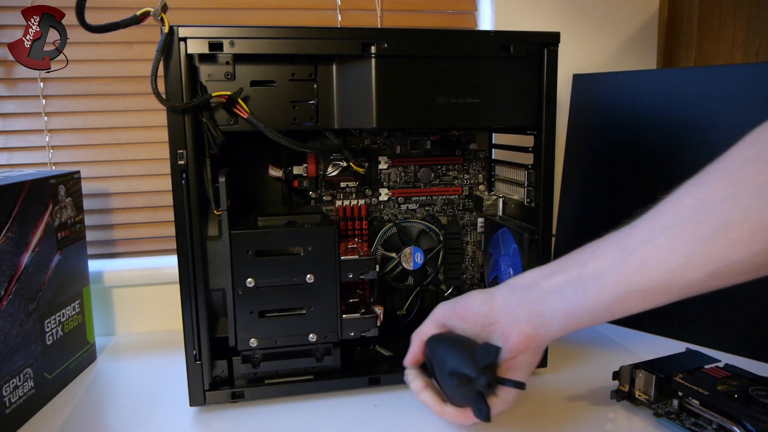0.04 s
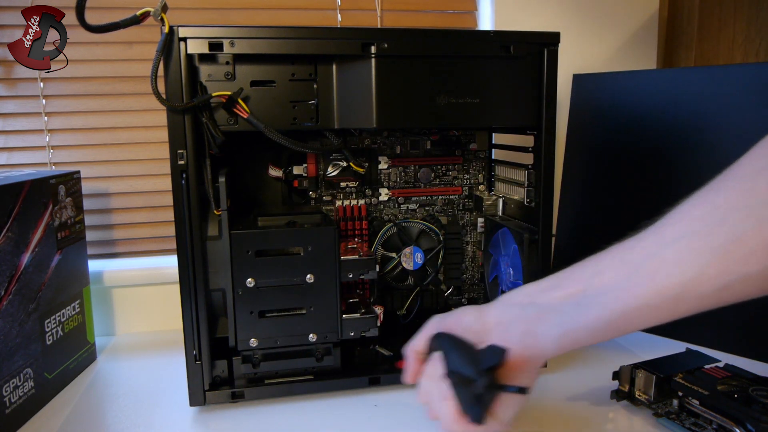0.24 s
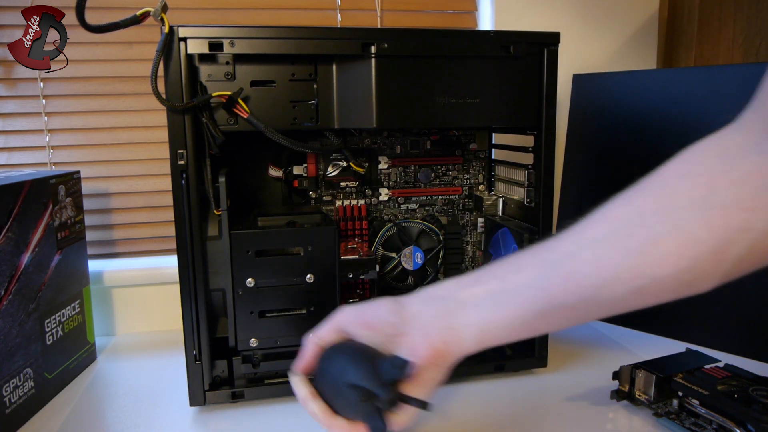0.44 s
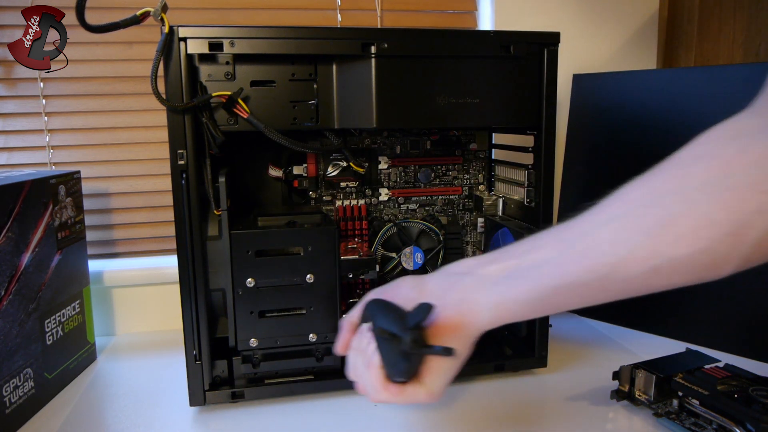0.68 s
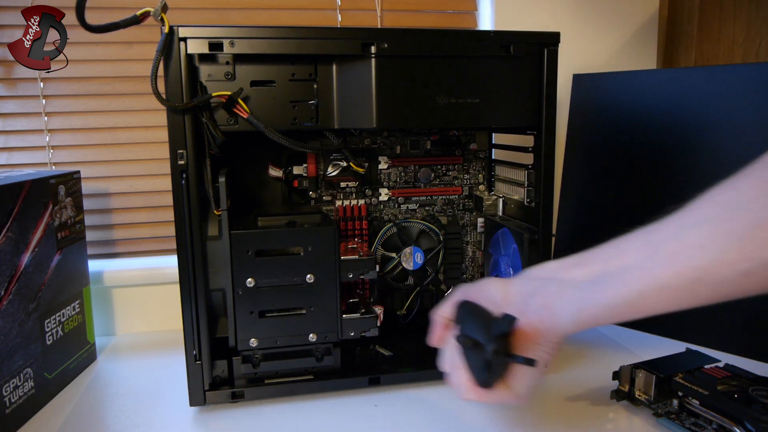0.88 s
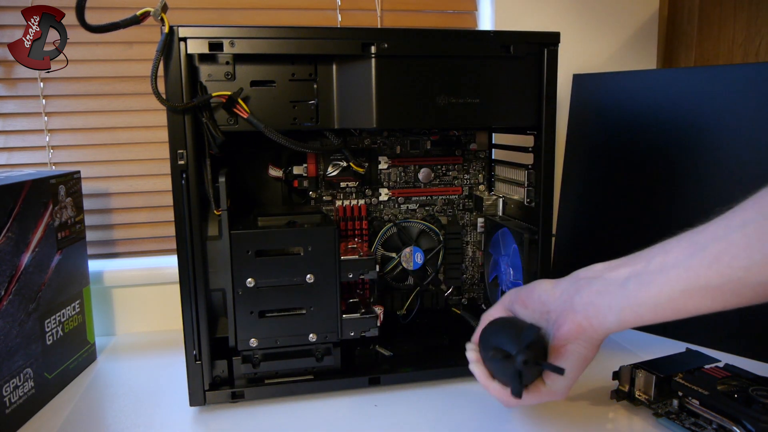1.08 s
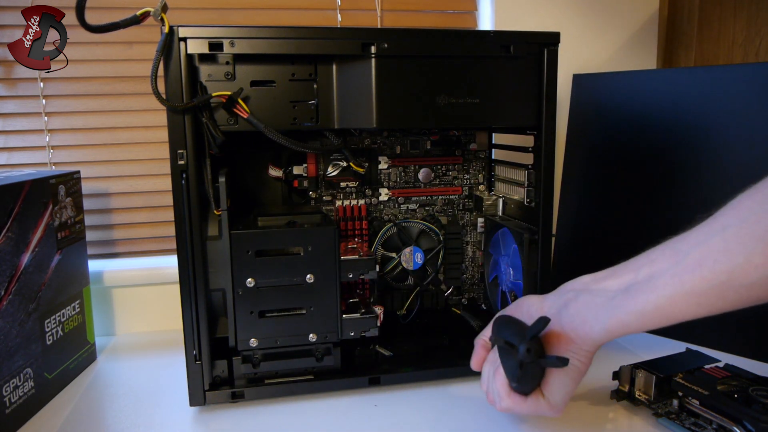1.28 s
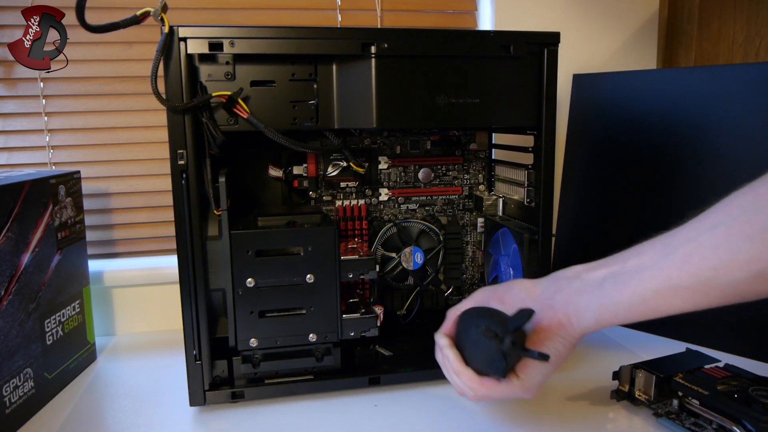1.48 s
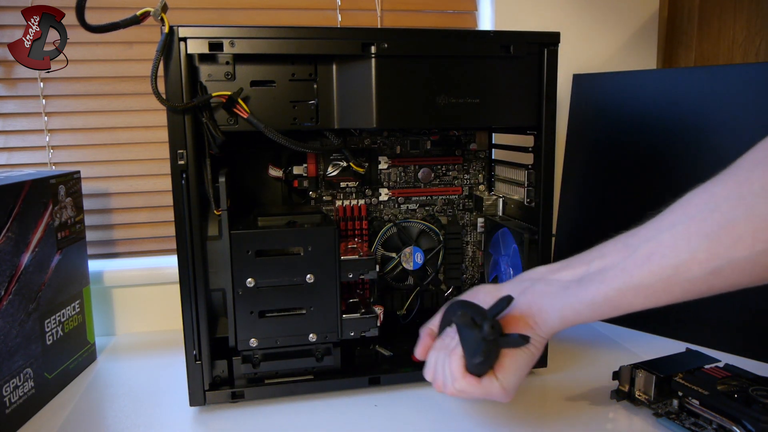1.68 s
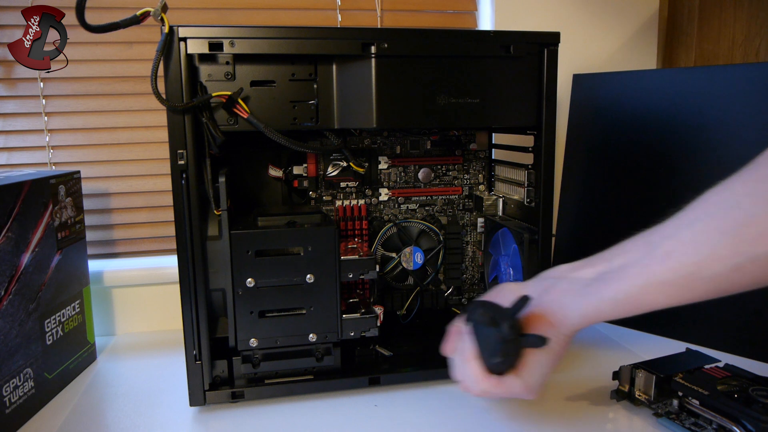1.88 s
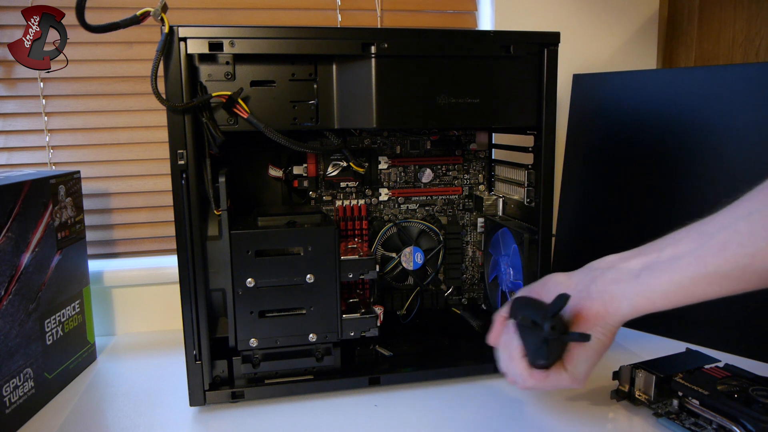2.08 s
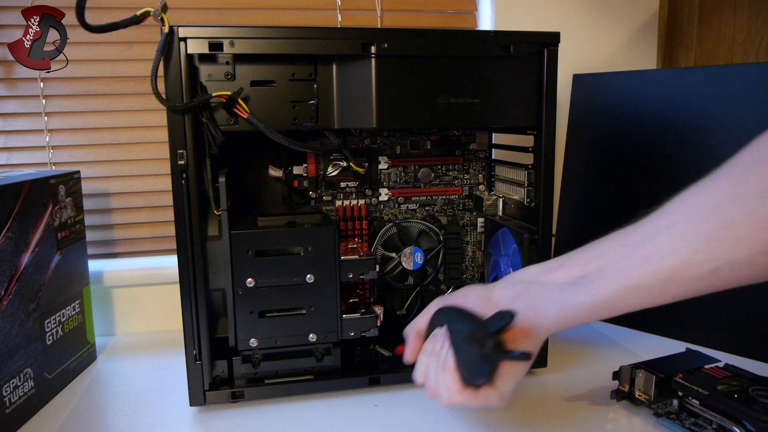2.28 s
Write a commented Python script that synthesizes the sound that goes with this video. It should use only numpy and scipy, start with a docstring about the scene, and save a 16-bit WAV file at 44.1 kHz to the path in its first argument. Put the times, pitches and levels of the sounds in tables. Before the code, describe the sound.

A rubber air blower puffs seven times, hissing and popping softly as it refills.

```python
"""A rubber bulb blower is pumped seven times at an open computer case in a small quiet room.
In each cycle air hisses in through the inlet valve, the elastic bulb pops back into shape,
and a squeeze drives a turbulent jet from the nozzle. The second puff strikes a sharp edge in the
case and becomes a loud, half-whistling hiss. Fingers knock softly on the rubber, the metal
panels reflect the hiss, and the room answers with low modes and a short reverberation."""
import sys
import numpy as np
from scipy import signal
from scipy.fft import rfft, irfft
from scipy.io import wavfile

SR = 44100
rng = np.random.default_rng(int(sys.argv[2]) if len(sys.argv) > 2 else 0)


def store_pcm(level_fs):
    """Save levels as 16-bit WAV."""
    pcm = np.round(np.clip(level_fs, -1, 1) * 32767).astype(np.int16)
    wavfile.write(sys.argv[1], SR, np.atleast_2d(pcm).T)


N = 108045
T = np.arange(N) / SR
HZ = np.maximum(np.arange(N // 2 + 1) * SR / N, 1)

# Squeezes of the bulb; rush, fine hiss and hollow are offsets from the level:
# start_s, peak_s, end_s, level_db, rush_db, fine_db, hollow_db, rise_exponent, jet_pitch_ratio
SQUEEZES = [(0.151, 0.229, 0.32, -30.5, 0.5, 1, -25, 0.97, 0.92),
            (0.48, 0.543, 0.75, -32, -8, 2.5, -2, 0.86, 0.85),
            (0.808, 0.906, 1.004, -38, 4, 4, -24, 1.2, 1.48),
            (1.201, 1.29, 1.397, -31, 1.5, 2, -4.5, 0.99, 1.04),
            (1.515, 1.618, 1.715, -27, -6.5, -1.5, -6.5, 1.93, 0.95),
            (1.878, 1.945, 2.057, -27, -8.5, -3, -4, 0.72, 1.04),
            (2.244, 2.317, 2.433, -32.5, 2.5, 1, -18, 1.82, 1.02)]
# Spectra of a puff's low rush, main jet and fine hiss: frequency_hz, relative_db
RUSH_SPECTRUM = [(90, -51.5), (200, -10.5), (400, -1), (750, -5), (1300, -8.5), (2200, -22), (5000, -55)]
JET_SPECTRUM = [(500, -32), (1200, -3), (2300, -4), (3600, -2), (4300, -4), (5600, -3.5), (7200, -11),
                (10000, -19.5), (16000, -19)]
FINE_SPECTRUM = [(2000, -28), (5000, -9.5), (7200, -5.5), (8500, -0.5), (10200, 1.5), (12800, -5),
                 (15500, -4.5)]
# Envelope of the jet on the edge: time_s, level_db
EDGE_ENVELOPE = [(.486, -101), (.502, -30), (0.52, -18.5), (.554, -13.5), (.59, -18.5), (.625, -25),
                 (.66, -45.5), (.70, -60)]
# Spectrum of the hiss at the edge: frequency_hz, relative_db
EDGE_SPECTRUM = [(1500, -32), (2800, -6.5), (3700, -1.5), (4600, -11), (5300, 0.5), (6200, 0.5), (7200, -2),
                 (8300, 0.5), (9200, -0.5), (11500, 1.5), (14000, 0), (15800, -9)]
# Resonances at the edge: pitch_hz, half_width_hz, relative_db
EDGE_RESONANCES = [(2966, 220, -16.5), (4368, 45, -12.5), (4635, 150, -11), (4740, 60, -18),
                   (4960, 75, -14), (5744, 51, -18.5), (6360, 61, -18.5), (8955, 52, -15), (9378, 40, -19),
                   (9970, 130, -13.5), (11300, 54, -15.5)]
# Spits as the jet crosses a part: centre_s, half_length_s, level_db
SPIT_BURSTS = [(1.21, 0.01, -43.5), (1.296, .005, -23.5)]
# Spectrum of a spit: frequency_hz, relative_db
SPIT_SPECTRUM = [(200, -35.5), (900, -8), (2200, -2), (5500, 0), (10500, -5), (14000, -18)]
# Intakes through the valve: open_s, full_s, level_db, sizzle_relative_db
INTAKES = [(-.015, .1, -33.5, -4), (0.335, .445, -32.5, -5), (0.682, .795, -36, -2), (0.999, 1.108, -35, 0),
           (1.383, 1.498, -34.5, -2.5), (1.73, 1.843, -34.5, -3.5), (2.078, 2.186, -35.5, -1.5)]
# Spectrum of the inflow: frequency_hz, relative_db
INLET_SPECTRUM = [(250, -10), (900, -10.5), (2000, -9.5), (3700, -3), (5000, 0), (6000, 2.5), (6700, 2),
                  (7900, 4.5), (10500, 2.5), (12900, -3), (15500, -5)]
# Breathy whistles of the valve: intake_index, pitch_hz, relative_db
INLET_WHISTLES = [(0, 4500, -13), (1, 5020, -12), (1, 5980, -9.5), (2, 4560, -9), (3, 6050, -11),
                  (3, 7750, -11), (3, 11700, -13), (4, 5900, -11), (5, 6100, -12), (6, 7950, -9)]
# Pops of the bulb: start_s, level_db, pitch_hz, push_relative_db, tick_relative_db
BULB_POPS = [(0.096, -23, 520, -4.5, -28), (0.4438, -22, 520, -2.5, -28), (0.7904, -25, 560, -1.5, -31),
             (1.1047, -32, 536, 1.5, -6.5), (1.4979, -16.5, 586, -15.5, -4.5), (1.84, -32, 520, 0.5, -5.5),
             (2.1863, -19, 575, -4.5, -12)]
# Spectrum of a pop's tick: frequency_hz, relative_db
TICK_SPECTRUM = [(200, -21), (1000, -4.5), (2200, -12.5), (4000, -15), (6200, -3.5), (8500, -13.5),
                 (15000, -19.5)]
# Knocks of fingers on the rubber: start_s, level_db, pitch_hz
FINGER_KNOCKS = [(0.335, -44, 227), (0.683, -47, 215), (1.002, -49, 171), (1.383, -43.5, 207),
                 (1.729, -48, 260), (1.789, -41.5, 300), (2.07, -44.5, 220), (2.125, -49, 560)]
# Reflections inside the case: left_delay_s, right_delay_s, gain_db
PANEL_REFLECTIONS = [(.00145, 0.0012, -19.5), (.0031, 0.0028, -12), (.0054, 0.0067, -10.5)]
# Reflections of a pop from nearby surfaces: delay_s, gain_db
WALL_REFLECTIONS = [(.0045, -18.5), (0.0182, -8.5)]
# Low modes of the room: pitch_hz, relative_db, t60_s
STANDING_WAVES = [(83.5, -41.5, 0.66), (133.5, -22.5, 0.36), (212.7, -13.5, 0.19), (340, -14.5, 0.092),
                  (425.3, -7.5, 0.2), (520, -27, 0.073), (589, -8.5, 0.11)]
# Likeness of left and right noise: frequency_hz, correlation
STEREO_CORRELATION = [(100, 0.98), (700, 0.98), (1200, 0.77), (2000, 0.67), (3000, 0.25), (3700, 0.63),
                      (5800, 0.63), (7500, -0.35), (9500, 0.44), (12500, 0.072), (14500, 0.47)]
# Spectrum of the room's background: frequency_hz, relative_db
BACKGROUND_SPECTRUM = [(25, -31), (60, -14), (130, 4.5), (220, 8.5), (500, 4), (1000, -5.5),
                       (3000, -19), (8000, -6), (16000, -14)]


def nozzle_puffs():
    """Turbulent jet noise follows the flow of each squeeze and excites a recess of the case."""
    rush = jet = fine = hollow = 0
    fall_exponent = 2.89
    for start, peak, end, db, rush_db, fine_db, hollow_db, rise_exponent, pitch_ratio in SQUEEZES:
        squeeze = np.interp(T, [start, peak, end], [0, 1, 0])
        rounded = squeeze ** 0.58 * np.sin(np.pi / 2 * squeeze) ** 0.42
        flow = rounded ** np.where(T < peak, rise_exponent, fall_exponent)
        rush += from_db(db + rush_db - 5) * flow ** 0.74
        jet += from_db(db) * flow * hiss([(hz * pitch_ratio, level) for hz, level in JET_SPECTRUM])
        hollow += from_db(db + hollow_db) * flow
        fine += from_db(db + fine_db - 1.5) * flow ** 0.83
    air = jet + rush * hiss(RUSH_SPECTRUM)
    air += hollow * resonant_noise(hz=2430, half_width_hz=610)
    air += fine * hiss(FINE_SPECTRUM)
    return air * turbulence(depth_db=1.23)


def edge_tones():
    """A jet splitting on an edge sheds bright hiss and rough whistles; the lower ones last longer."""
    times, levels = np.transpose(EDGE_ENVELOPE)
    flow = from_db(np.interp(T, times, levels, left=-120, right=-120) - levels.max())
    air = flow * hiss(EDGE_SPECTRUM) * pan(db=1)
    for hz, half_width_hz, db in EDGE_RESONANCES:
        envelope = flow ** (0.45 if hz < 7000 else 1)
        position = pan(db=1.94 * (hz - 4000) / 1000)
        air += from_db(db) * envelope * resonant_noise(hz, half_width_hz) * position
    return from_db(levels.max()) * air * turbulence(depth_db=1.0)


def spits():
    """Flow noise flares briefly as the jet crosses an obstacle."""
    envelope = sum(from_db(db) * pulse(centre, half_length) for centre, half_length, db in SPIT_BURSTS)
    return envelope * hiss(SPIT_SPECTRUM)


def inlet_valve():
    """Flow through a narrow valve hisses, sizzles and whistles, swelling until the bulb is full."""
    open_s, shut_s = 0.012, 0.0093
    swell_db_per_s, sizzle_extra_db_per_s = 28.5, 51
    inflow = hiss(INLET_SPECTRUM)
    sizzle = resonant_noise(hz=14220, half_width_hz=950) * pan(db=-1.5)
    air = 0
    for intake, (start, full, db, sizzle_db) in enumerate(INTAKES):
        opening = (1 - np.exp(-since(start) / open_s)) * np.exp(-since(full) / shut_s)
        swell = from_db(db + swell_db_per_s * np.minimum(T - full, 0))
        past_midpoint_s = np.minimum(T, full) - (start + full) / 2
        sizzle_gain = from_db(sizzle_db + sizzle_extra_db_per_s * past_midpoint_s)
        whistles = sum(from_db(level) * resonant_noise(hz, half_width_hz=200)
                       for index, hz, level in INLET_WHISTLES if index == intake)
        air += opening * swell * (inflow + sizzle_gain * sizzle + whistles)
    return air * turbulence(depth_db=1.36) * pan(db=-0.5)


def bulb_pops():
    """Elastic recoil gives a thump, a push of air and a tick, which echo and excite the room's modes."""
    direct = ring = 0
    tick_noise, tick_decay_s = hiss(TICK_SPECTRUM), 0.0047
    for start, db, hz, push_db, tick_db in BULB_POPS:
        thump = 2.24 * rubber_thud(start, hz, decay_s=0.003)
        push = -1.57 * from_db(push_db) * pulse(start + 0.0017, half_length_s=0.00055)
        tick = from_db(tick_db) * tick_noise * (T > start) * np.exp(-since(start) / tick_decay_s)
        direct += from_db(db) * (thump + push + tick)
        ring += from_db(db) * room_modes(start, push_db)
    echoes = sum(from_db(db) * delayed(direct, delay, delay) for delay, db in WALL_REFLECTIONS)
    return direct + echoes + ring


def finger_knocks():
    """Soft impacts of fingers letting go excite the rubber wall and the room's modes."""
    return sum(from_db(db) * (2 * rubber_thud(start, hz, decay_s=0.0078)
                              + from_db(-8) * room_modes(start))
               for start, db, hz in FINGER_KNOCKS)


def rubber_thud(start, hz, decay_s):
    """A damped oscillation whose pitch glides up as the rubber wall stiffens."""
    rise_s, glide_s = 0.0015, 0.00077
    t = since(start)
    cycles = hz * (t - glide_s * (1 - np.exp(-t / glide_s)))
    return np.sin(2 * np.pi * cycles) * (1 - np.exp(-t / rise_s)) * np.exp(-t / decay_s)


def case_reflections(air):
    """Reflections from the metal panels interfere with the direct hiss and colour it hollow."""
    bright = butterworth(air, "high", hz=1000)
    echoes = sum(from_db(db) * delayed(bright, left, right) for left, right, db in PANEL_REFLECTIONS)
    return from_db(-0.99) * (air + echoes)


def room_modes(start, push_db=0):
    """Standing waves build and decay after a thump; a stronger push feeds the lower ones more."""
    t, build_s = since(start), 0.0026
    ring = 0
    for hz, db, t60_s in STANDING_WAVES:
        drive_db = 0.42 * push_db if hz < 480 else 0
        ring -= np.sin(2 * np.pi * hz * t) * from_db(db + drive_db - 60 * t / t60_s)
    return (1 - np.exp(-t / build_s)) * ring


def reverberation(x):
    """The room's diffuse field decays exponentially, the treble fastest."""
    split_hz, low_t60_s, treble_t60_s, gap_s = 9000, 0.32, 0.057, 0.00572
    low = butterworth(stereo_noise(1), "low", split_hz) * from_db(-60 * T / low_t60_s)
    treble = butterworth(stereo_noise(1), "high", split_hz) * from_db(-60 * T / treble_t60_s)
    response = unit_rms((low + treble) * (T > gap_s)) / np.sqrt(N)
    diffuse = signal.fftconvolve(x, response, axes=1)[:, :N]
    return butterworth(diffuse, "high", hz=395)


def background():
    """Stationary noise, strongest in the bass, is the quiet room's floor."""
    return from_db(-53.5) * hiss(BACKGROUND_SPECTRUM)


def turbulence(depth_db):
    """Turbulent flow modulates the amplitude in quick random swings."""
    corner_hz = 43.5
    swings = irfft(rfft(rng.standard_normal(N)) / (1 + (HZ / corner_hz) ** 2), N)
    return from_db(depth_db * unit_rms(swings))


def hiss(spectrum):
    """Broadband noise shaped by a spectral envelope."""
    return stereo_noise(from_db(on_log_frequency(spectrum)))


def resonant_noise(hz, half_width_hz):
    """A resonance selects one band of the flow noise."""
    return stereo_noise(1 / (1 + ((HZ - hz) / half_width_hz) ** 2))


def stereo_noise(gain):
    """Shared and opposed noise add to a partly correlated pair of unit rms."""
    mid, side = rfft(rng.standard_normal((2, N)))
    correlation = on_log_frequency(STEREO_CORRELATION)
    pair = np.sqrt(1 + correlation) * mid + np.sqrt(1 - correlation) * side * [[1], [-1]]
    return unit_rms(irfft(gain * pair, N))


def delayed(x, left_s, right_s):
    """A longer path delays the arrival in each channel."""
    return np.array([np.interp(T - delay, T, side, left=0) for side, delay in zip(x, (left_s, right_s))])


def pan(db):
    """A level difference, left over right, sets the direction."""
    return from_db(np.array([[.5], [-.5]]) * db)


def butterworth(x, kind, hz):
    """A second-order filter slopes 12 dB per octave beyond its corner."""
    return signal.sosfilt(signal.butter(2, hz, kind, fs=SR, output="sos"), x)


def on_log_frequency(points):
    """Interpolation along a log-frequency axis."""
    hz, value = np.transpose(points)
    return np.interp(np.log(HZ), np.log(hz), value)


def pulse(centre_s, half_length_s):
    """A Gaussian pulse of unit height."""
    return np.exp(-((T - centre_s) / half_length_s) ** 2)


def since(start):
    """Elapsed time, zero before the start."""
    return np.maximum(T - start, 0)


def from_db(db):
    """Decibels as an amplitude ratio."""
    return 10 ** (np.asarray(db) / 20)


def unit_rms(x):
    """Normalisation to unit mean power."""
    return x / np.sqrt(np.mean(x ** 2) + 1e-20)


def scene():
    """The blower, its reverberation and the background add by superposition."""
    air = nozzle_puffs() + spits() + edge_tones() + inlet_valve()
    blower = case_reflections(air) + bulb_pops() + finger_knocks()
    return blower + from_db(-9.5) * reverberation(blower) + background()


def record(dry):
    """Band limiting rolls off the deep bass and cuts the top steeply."""
    cutoff_hz = 15800
    steep_low_pass = signal.ellip(12, .1, 80, cutoff_hz, fs=SR, output="sos")
    return signal.sosfilt(steep_low_pass, butterworth(dry, "high", hz=77))


dry = scene()
out = record(dry)
store_pcm(out)
```